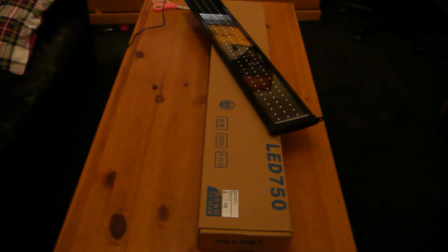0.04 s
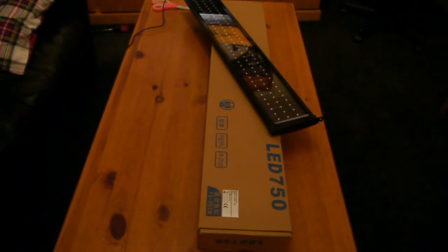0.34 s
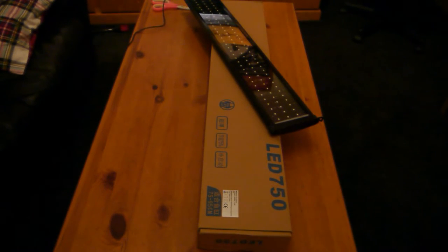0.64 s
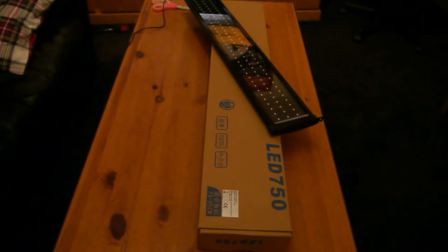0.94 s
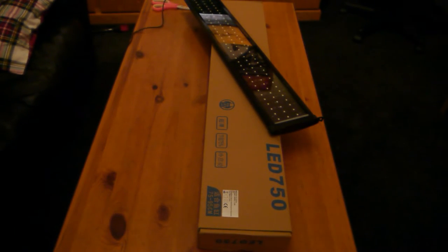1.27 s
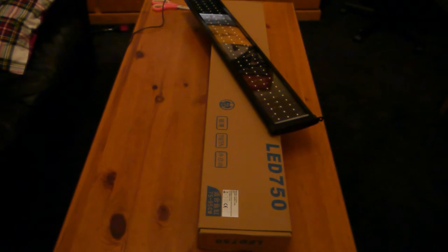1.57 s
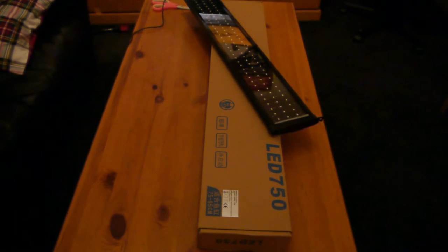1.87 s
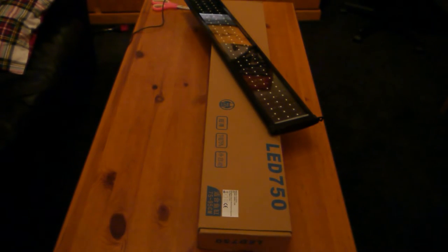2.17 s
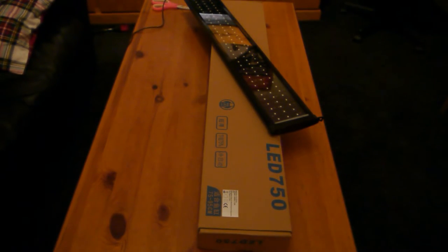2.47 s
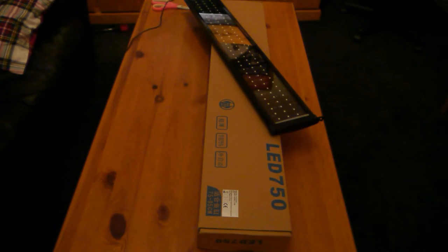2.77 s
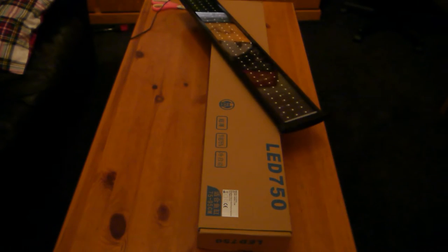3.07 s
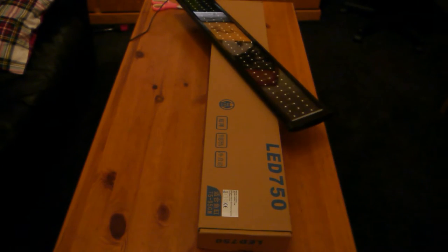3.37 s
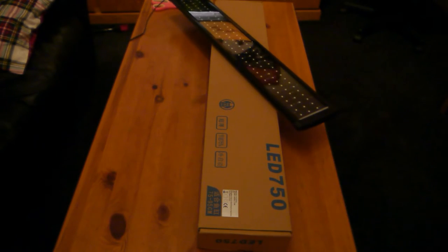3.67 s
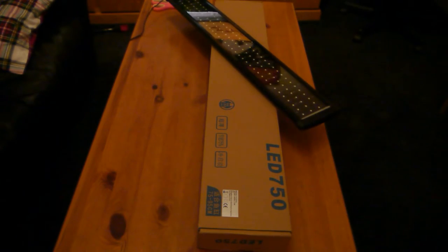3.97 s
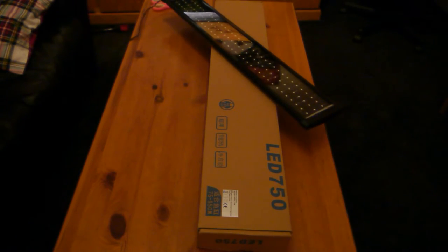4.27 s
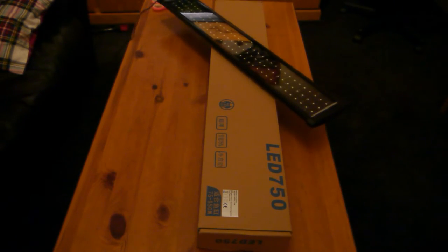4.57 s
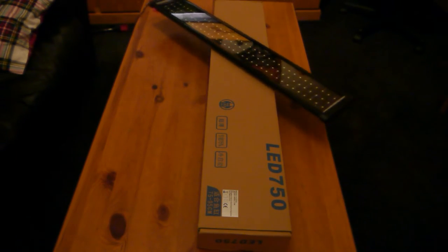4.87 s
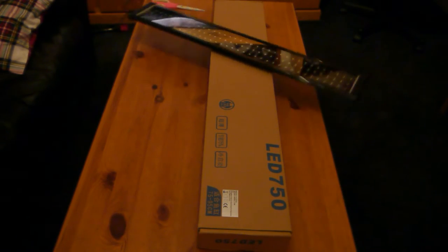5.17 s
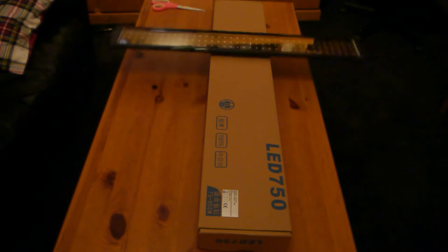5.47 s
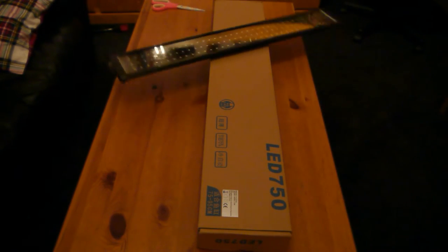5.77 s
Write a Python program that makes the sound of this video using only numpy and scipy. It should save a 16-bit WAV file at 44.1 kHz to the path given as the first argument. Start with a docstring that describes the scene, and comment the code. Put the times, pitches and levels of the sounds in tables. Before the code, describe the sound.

Hollow knocks and clatter of a plastic fixture shifted over a cardboard box, then a sharp plastic snap and light taps, close indoors.

```python
"""Plastic light bar on a cardboard box

A small room, two microphones close to a wooden table. On it, a light bar is shifted, knocked and lifted
on a cardboard box. Each blow rings the table top, the hollow box and the loose, chattering casing.
The casing also snaps sharply, and in between it scrapes over the cardboard with its cable.
Under it all lie faint room rumble, mains hum and microphone hiss."""
import sys
import numpy as np
from scipy import signal
from scipy.fft import rfft, irfft, next_fast_len
from scipy.io import wavfile

SR = 44100
rng = np.random.default_rng(int(sys.argv[2]) if len(sys.argv) > 2 else 0)


def generate_wav(sig):
    """Save sig (samples, or channels by samples) to the path in sys.argv[1] as 16-bit PCM at SR."""
    pcm = np.round(np.clip(np.atleast_2d(sig).T, -1, 1) * 32767).astype(np.int16)
    wavfile.write(sys.argv[1], SR, pcm)


N = 265923

# The small room. Each row: frequency in Hz, time to fall 60 dB in seconds.
ROOM_DECAY = [(100, 0.39), (260, 0.23), (700, 0.23), (1800, 0.34), (5000, 0.25), (8000, 0.27)]
# Reflections at the microphone pair. Each row: frequency in Hz, left-right likeness from 0 to 1.
ROOM_LIKENESS = [(200, 0.9994), (450, 1), (900, 0.88), (1800, 0.5), (3500, 0.28), (6500, 0.63)]
# Rumble and hiss, in phase and out of phase across the pair. Each row: frequency in Hz, level in dB.
HISS_COMMON = [(15, -13), (28, -0.5), (45, -25), (100, -9.5), (200, -4.5), (300, -3), (450, -9),
               (850, -12.5), (1500, -16.5), (3300, -23), (5500, -23), (7000, -18.5), (7800, -26.5),
               (9000, -48.5)]
HISS_OPPOSED = [(20, -9.5), (110, -7.5), (400, -5.5), (1000, -6), (2700, -10), (5000, -14), (7200, -20),
                (9000, -46)]
# The treble of the hiss, which dulls for a moment. Each row: time in seconds, gain in dB.
HISS_TREBLE = [(.4, -13), (.6, -43), (1.0, -3.5), (1.6, 8.5), (3.5, 5), (4.3, 1.5), (5.7, 3), (5.9, -2)]
# Partials of the mains hum. Each row: frequency in Hz, level in dB.
MAINS_HUM = [(59.5, -68.5), (101, -68), (150.5, -75), (200, -61.5), (300, -67), (350, -71), (500, -76)]
# Spectra of scrape, swish, plastic snap and contact tick. Each row: frequency in Hz, level in dB.
SCRAPE_COLOUR = [(80, -22), (130, -14), (250, 1.5), (430, 4), (680, -1.5), (950, -4.5), (1400, -6),
                 (2500, -15), (5000, -45)]
SWISH_COLOUR = [(600, 4.5), (1500, -4), (2500, -4), (4000, -3), (5500, -0.5), (7000, 0.5), (7800, -15),
                (9000, -32)]
SNAP_COLOUR = [(90, -51), (220, -37.5), (370, 1), (520, -8), (780, -3), (1500, -10.5), (2400, -2),
               (3200, -9.5), (4600, -6), (5500, -2), (7100, 1), (7800, -14.5), (9000, -28.5)]
TICK_COLOUR = [(500, -23.5), (1000, 0.5), (2000, -1), (2800, -3.5), (4000, -0.5), (5500, -1.5),
               (7000, -3.5), (7800, -9), (9000, -33.5)]
# Pushes of casing and cable over the cardboard. Each row: start, time speeding up and time held
# in seconds, level of the low scrape and of the high swish in dB.
PUSHES = [(-.05, 0.078, .2, -53, -52), (0.271, 0.045, 0.084, -46.5, -42.5), (.36, 0.047, 0.17, -44, -51.5),
          (.62, 0.058, .11, -51, -51), (.8, 0.038, .12, -48.5, -55), (1.05, 0.068, 0.046, -48.5, -50.5),
          (1.28, 0.13, 0.13, -37.5, -42), (1.58, 0.023, 0.091, -47.5, -51), (1.78, 0.17, .04, -42, -40),
          (2.14, 0.046, 0.12, -38, -41), (2.56, 0.081, .14, -58.5, -55), (3.25, .15, 0.3, -60, -57),
          (3.58, 0.17, 0.069, -53.5, -52.5), (3.934, 0.0083, 0.0038, -43.5, -42.5),
          (4.62, .14, 0.031, -55.5, -76), (5.0, 0.16, 0.21, -54, -61), (5.361, 0.075, 0.093, -55.5, -76),
          (5.7, 0.19, 0.17, -52.5, -57.5)]
# Snaps and creaks of the plastic. Each row: time in seconds, level in dB, swell in seconds, note in Hz.
PLASTIC_SNAPS = [(2.803, -28.5, 0.00072, 1250), (2.824, -24.5, 0.0006, 1220), (2.85, -39, 0.0008, 837),
                 (3.7389, -10, .0032, 5500), (3.7425, -7, 0.00049, 6740), (3.7499, -17.5, .002, 372),
                 (3.7545, -13, .003, 6740), (3.7585, -25, 0.0027, 760), (3.985, -19, 0.0067, 3240),
                 (4.483, -37, 0.0071, 3740), (5.036, -39.5, .0006, 1580), (5.383, -47.5, 0.004, 1640),
                 (5.835, -39, 0.0011, 1170), (5.954, -45, 0.0014, 3480)]
# Modes of table top, box and casing. Each row: frequency in Hz, level in dB, seconds to fall 60 dB.
TABLE_MODES = [(99.6, -5.5, 0.35), (116, 0.5, 0.13), (145.2, -0.5, 0.16), (158.7, -7.5, 0.09),
               (179.2, -9.5, 0.2), (220.6, -23, 0.21)]
BOX_MODES = [(222.8, -1.5, 0.11), (239.4, -9, 0.59), (261.9, -4.5, 0.46), (305.3, -4, 0.13),
             (323.5, 1.5, 0.12), (358, 7, 0.086), (413.2, 1, 0.17), (436.6, 1.5, 0.12), (478, 4.5, 0.072),
             (517, -4, 0.07), (622, 2, 0.065)]
CASING_MODES = [(677, -11, 0.097), (751, -8, 0.062), (788, 0.5, 0.041), (858, -6.5, 0.076), (919, 1, 0.029),
                (1030, -2.5, 0.027), (1084, -7, 0.027), (1214, 2.5, 0.02), (1300, -5.5, 0.01),
                (1577, 3, 0.011), (1747, -17.5, 0.033), (1987, -5.5, 0.011), (2494, 0.5, 0.0079)]
# Blows of the bar. Each row: start in seconds, force in dB, shares of table top, casing and tick in dB,
# note favoured by the point of contact in Hz, seconds in which the bar's weight damps the box.
BLOWS = [(0.002, -36.5, 6, -2.5, -6.5, 720, .1), (0.705, -37.5, -22, 7.5, -28, 425, .1),
         (0.985, -7, -23.5, -14.5, -39, 446, 0.074), (0.99, -10.5, -33, -11.5, -32.5, 355, 0.12),
         (1.007, -15, -27, -31, -23, 255, 0.24), (1.29, -33, -33, -19.5, -14.5, 440, 0.12),
         (1.352, -23, -15, -20, -27.5, 420, 0.13), (1.376, -15, -15, -11, -23, 220, 0.054),
         (1.451, -14, -8, -8, -20, 324, 0.11), (1.469, -4, -33, -1, -24, 581, 0.046),
         (1.472, -2.5, -22.5, -1, -23.5, 724, 0.091), (1.512, -10, -22, -5, -22, 422.4, .04),
         (1.646, -19.5, -24, -14.5, -22, 663, 0.088), (1.873, -34, -6.5, -23.5, -31, 460, 0.035),
         (2.007, -8, -7, -21, -16.5, 374, 0.032), (2.014, -15, -20, 3.5, -7, 882, 0.022),
         (2.022, 3.5, -21, -28, -21.5, 240, 0.021), (2.035, -7, -29.5, -17, -23, 296, 0.0088),
         (2.047, -0.5, -24.5, -22.5, -21.5, 610, 0.018), (2.052, -3, -17, -14, -26, 225, 0.023),
         (2.083, -12, -20.5, -8.5, -15, 336, 0.0089), (2.099, -4, -20, -29.5, -34, 335, 0.021),
         (2.108, -4, -14.5, -16.5, -30, 369.6, 0.009), (2.125, -7.5, -21, -15.5, -34, 329, .1),
         (2.181, -7, -21, -17.5, -26, 348, .025), (2.21, -17.5, -26, -8, -17.5, 410, .04),
         (2.823, -26, -25, -2.5, -5, 295, 0.073), (2.85, -23.5, -24.5, -4, -9, 615, 0.077),
         (3.332, -35.5, -21, -6, -19, 349, 0.07), (3.975, -28.5, -13, 0, -15, 585, 0.068),
         (4.486, -31, -9, -34, -18, 320, .2), (4.909, -27.5, -10, -4, -15.5, 310, 0.13),
         (4.965, -27, -15.5, -12, -20.5, 289, 0.056), (5.224, -26, -18, -18, -23, 296, .2),
         (5.805, -29.5, -1, -15, -19, 297, .1), (5.865, -20.5, -27, -8, -40, 617, .1),
         (5.878, -27.5, -21, -3.5, -45, 730, 0.12), (5.917, -32.5, -22, -6, -41, 720, 0.11),
         (5.968, -30.5, -25, -15, -34, 403, 0.072)]


def amp(db):
    """Decibels to gain."""
    return 10 ** (np.asarray(db) / 20)


def unit_rms(x):
    """Scales to an rms of one."""
    return x / np.sqrt(np.mean(x ** 2) + 1e-20)


def lookup(points, hz):
    """Reads a table on a log-frequency axis."""
    f, value = np.transpose(points)
    return np.interp(np.log(hz + 1), np.log(f + 1), value)


def bump(hz, centre_hz, width):
    """A bell around one frequency; its width is a share of that frequency."""
    return np.exp(-(np.log((hz + 1) / centre_hz) / width) ** 2)


def add(mix, s, sound):
    """Mixes a sound in at s seconds."""
    part = mix[max(round(s * SR), 0):][:len(sound)]
    part += sound[:len(part)]


def coloured(x, colour):
    """Gives a steady sound a spectrum, at an rms of one."""
    size = next_fast_len(N, True)
    gain = amp(lookup(colour, np.fft.rfftfreq(size, 1 / SR)))
    return unit_rms(irfft(rfft(x, size) * gain, size)[:N])


def resonate(x, hz, width_hz):
    """A resonance of gain one that follows the curve hz."""
    turn = np.exp(2j * np.pi * np.cumsum(hz) / SR)
    pole = np.exp(-np.pi * width_hz / SR)
    return 2 * (turn * signal.lfilter([1 - pole], [1, -pole], x / turn)).real


def room(x, direct_db, wet_db, build_s):
    """The direct sound, then scattered reflections, at two close microphones."""
    t = np.arange(SR // 2) / SR
    taps = rng.standard_normal((2, len(t))) * (rng.random(len(t)) < 5000 / SR)
    taps *= 1 - np.exp(-t / build_s)
    hz, age, (left, other) = signal.stft(taps, SR, nperseg=256)
    alike = np.clip(lookup(ROOM_LIKENESS, hz), -1, 1)[:, None]
    right = alike * left + np.sqrt(1 - alike ** 2) * other
    decay = amp(-60 * age / lookup(ROOM_DECAY, hz)[:, None])
    tail = signal.istft(np.array([left, right]) * decay, SR, nperseg=256)[1]
    response = amp(wet_db) * tail / np.linalg.norm(tail[0])
    response[:, 0] += amp(direct_db)
    return signal.oaconvolve(x[None], response, axes=1)[:, :N]


def wall_echo(x, delay_s, echo_db):
    """Low sound comes back once from the nearest wall."""
    return x + amp(echo_db) * np.interp(np.arange(N) - delay_s * SR, np.arange(N), x, left=0)


def room_tone(common_db=-55.5, opposed_db=-54.5):
    """Room rumble and wide microphone hiss; the treble dips briefly near the start."""
    common = amp(common_db) * coloured(rng.standard_normal(N), HISS_COMMON)
    opposed = amp(opposed_db) * coloured(rng.standard_normal(N), HISS_OPPOSED)
    hiss = common + np.array([opposed, -opposed])
    treble = signal.sosfiltfilt(signal.butter(2, 4500, "high", fs=SR, output="sos"), hiss)
    treble_gain = amp(np.interp(np.arange(N) / SR, *np.transpose(HISS_TREBLE)))
    return hiss + (treble_gain - 1) * treble


def mains_hum():
    """A faint hum, alike at both microphones; each partial wavers slightly in phase."""
    t = np.arange(N) / SR
    hum = np.zeros(N)
    for hz, db in MAINS_HUM:
        waver = 0.4 * coloured(rng.standard_normal(N), [(2, 7.5), (12, -21), (40, -96.0)])
        hum += np.sqrt(2) * amp(db) * np.sin(2 * np.pi * (hz * t + rng.random()) + waver)
    return hum


def slips(per_s, uneven_db):
    """Friction as a train of tiny slips of uneven size."""
    size = amp(uneven_db * np.minimum(rng.exponential(1, N), 4))
    return size * rng.standard_normal(N) * (rng.random(N) < per_s / SR)


def slides(coast_s=0.074, rest_hz=380, rise_hz=253, bright_db=-39.5):
    """Casing and cable slide: coarse slips sound the hollow box, higher with speed; fine ones swish."""
    t = np.arange(N) / SR
    speed, scrape_gain, swish_gain = np.zeros((3, N))
    for start, rise, hold, scrape_db, swish_db in PUSHES:
        coast = np.exp(-np.maximum(t - start - rise - hold, 0) / coast_s)
        push = np.clip((t - start) / rise, 0, 1) * coast
        speed = np.maximum(speed, push)
        scrape_gain = np.maximum(scrape_gain, amp(scrape_db) * push)
        swish_gain = np.maximum(swish_gain, amp(swish_db) * push)
    coarse = coloured(slips(per_s=1600, uneven_db=5.0), SCRAPE_COLOUR)
    note = unit_rms(resonate(coarse, rest_hz + rise_hz * speed, width_hz=46))
    scrape = scrape_gain * unit_rms(coarse + amp(-12) * note)
    fine = coloured(slips(per_s=5000, uneven_db=4.0), SWISH_COLOUR)
    dull = signal.sosfiltfilt(signal.butter(4, 5400, fs=SR, output="sos"), fine)
    brightness = np.minimum(swish_gain / amp(bright_db), 1)  # a light swish loses its top
    swish = swish_gain * (dull + brightness * (fine - dull))
    return (room(scrape, direct_db=-3.0, wet_db=-3, build_s=0.0025)
            + room(swish, direct_db=[-6, -8], wet_db=1.0, build_s=0.0005))


def click(colour, ring_hz=1000, ring_db=0, size=4096):
    """A causal pulse of the given spectrum, with one broad resonance and a peak of one."""
    hz = abs(np.fft.fftfreq(size, 1 / SR))
    log_gain = np.log(amp(lookup(colour, hz) + ring_db * bump(hz, ring_hz, width=0.51)))
    minimum_phase = np.exp(np.conj(signal.hilbert(log_gain)))
    pulse = np.fft.ifft(minimum_phase).real[:size // 2]
    return pulse / abs(pulse).max()


def crackle(pulse, swell_s):
    """Spreads a pulse into a quick run of micro-slips that swells and fades, keeping its spectrum."""
    swell = np.hanning(int(2 * swell_s * SR) + 3)
    spectrum = rfft(swell * rng.standard_normal(SR)[:len(swell)])
    micro_slips = irfft(spectrum / abs(spectrum), len(swell))
    return signal.fftconvolve(micro_slips, pulse)


def snaps(places=3, note_db=-37.5, ring_cycles=70):
    """The plastic catches and lets go in quick runs of bright clicks, at a few places along the bar."""
    tracks = np.zeros((places, N))
    for k, (s, db, swell_s, ring_hz) in enumerate(PLASTIC_SNAPS):
        lift_db = -0.59 * db  # the lighter the snap, the more its note stands out
        pulse = click(SNAP_COLOUR, ring_hz, lift_db, size=8192)
        t = np.arange(len(pulse)) / SR
        linger = amp(note_db + lift_db - 60 * t * ring_hz / ring_cycles)
        note = linger * np.sin(2 * np.pi * ring_hz * t)
        add(tracks[k % places], s - swell_s, amp(db) * crackle(pulse + note, swell_s))
    return sum(room(x, direct_db=[4, 2], wet_db=9.0, build_s=0.0012) for x in tracks)


def rings(modes, band_hz, spread, focus, rise_s, lift_share=1.0, brightening=0, usual_tick_db=-10.5):
    """One ring of a struck body for each blow, its modes weighted by the contact."""
    hz, db, t60 = np.transpose(modes)[:, :, None]
    t = np.arange(SR // 2) / SR
    onset = 1 - np.exp(-t / rise_s)  # bending waves need time to fill a large panel
    radiation = signal.butter(2, band_hz, "band", fs=SR, output="sos")
    partials = signal.sosfilt(radiation, onset * amp(db - 60 * t / t60) * np.sin(2 * np.pi * hz * t))
    _, force_db, _, _, tick_db, note_hz, _ = np.transpose(BLOWS)[:, :, None]
    # The point of contact favours the modes near its note, the more so in a light blow.
    lift_db = lift_share * (5.5 - 0.26 * force_db) * (bump(hz.T, note_hz, focus) - .5)
    # A hard contact, with more tick than usual, rings brighter; a soft one duller.
    tilt_db = brightening * (tick_db - usual_tick_db) * np.log2(hz.T / hz[0])
    weights = amp(lift_db + tilt_db) * (1 + spread * rng.standard_normal(lift_db.shape))
    return weights @ partials / abs(partials.sum(0)).max()


def chatter(count=6, gap_s=.022, first_db=-11.5, loss_db=2.5):
    """The loose casing hits, then bounces ever more weakly at uneven gaps: pairs of seconds and dB."""
    delays = np.cumsum(gap_s * (.5 + rng.random(count)))
    return [(0, 0), *zip(delays, first_db - loss_db * np.arange(count))]


def knocks(places=3, casing_boost_db=3.5, tick_boost_db=9.5):
    """Blows at a few places ring table, box and chattering casing, with a gritty tick at the contact."""
    table = rings(TABLE_MODES, band_hz=[90, 260], spread=0.13, focus=0.12, rise_s=0.0044, lift_share=0.82)
    box = rings(BOX_MODES, band_hz=[195, 740], spread=0.19, focus=0.11, rise_s=0.0025)
    casing = rings(CASING_MODES, band_hz=[583, 3150], spread=0.68, focus=0.18, rise_s=0.000067,
                   brightening=0.092)
    tick = click(TICK_COLOUR)
    t = np.arange(SR // 2) / SR
    thuds, clacks = np.zeros((2, places, N))
    for k, (s, force_db, table_db, casing_db, tick_db, _, damp_s) in enumerate(BLOWS):
        thud = box[k] * np.exp(-t / damp_s) + amp(table_db) * table[k]
        add(thuds[k % places], s, amp(force_db) * thud)
        clack = amp(casing_db + casing_boost_db) * casing[k]
        add(clack, 0, amp(tick_db + tick_boost_db) * crackle(tick, swell_s=.0016))
        for delay, bounce_db in chatter():
            add(clacks[k % places], s + delay, amp(force_db + bounce_db) * clack)
    echoed = [wall_echo(x, delay_s=.0182, echo_db=-6.5) for x in thuds]
    return (sum(room(x, direct_db=-3.0, wet_db=-7.5, build_s=0.0073) for x in echoed)
            + sum(room(x, direct_db=[3, -2], wet_db=6, build_s=0.00077) for x in clacks))


def scene():
    """The handling is close and a little to the right, so it reaches the left microphone later."""
    # A steep low cut takes the deep bass out of the knocks, snaps and slides.
    bass_cut = signal.butter(8, 93, "high", fs=SR, output="sos")
    left, right = signal.sosfilt(bass_cut, knocks() + snaps() + slides())
    size = next_fast_len(N, True)
    hz = np.fft.rfftfreq(size, 1 / SR)
    lag_rad = lookup([(50, 0), (400, 0.14), (900, 0.0), (1800, 0.87), (3500, 1.0), (6500, 0.68)], hz)
    left = irfft(rfft(left, size) * np.exp(-1j * lag_rad), size)[:N]
    return np.array([left, right]) + room_tone() + mains_hum()


def record(dry, ceiling=.93, edge_hz=9000):
    """The recorder clips the highest peaks and cuts the top of the treble."""
    low_pass = signal.firwin(401, edge_hz, window=("kaiser", 9), fs=SR)
    clipped = np.clip(dry, -ceiling, ceiling)
    return signal.oaconvolve(clipped, low_pass[None], "same")


dry = scene()
out = record(dry)
generate_wav(out)
```